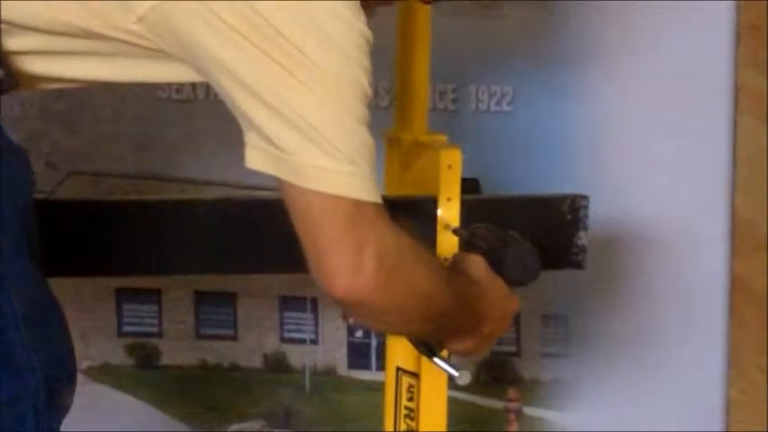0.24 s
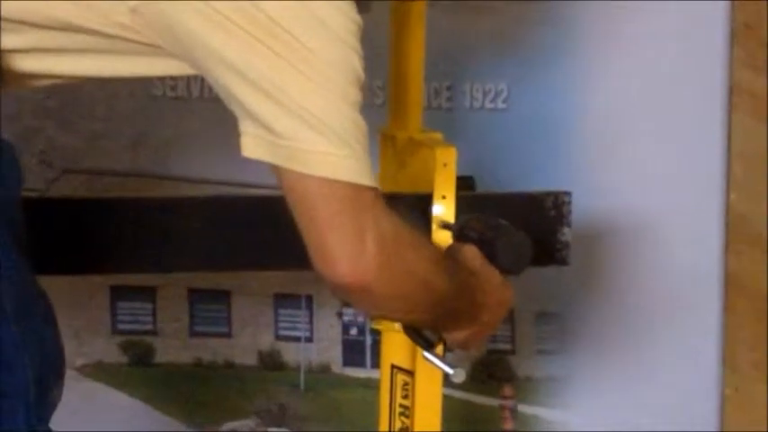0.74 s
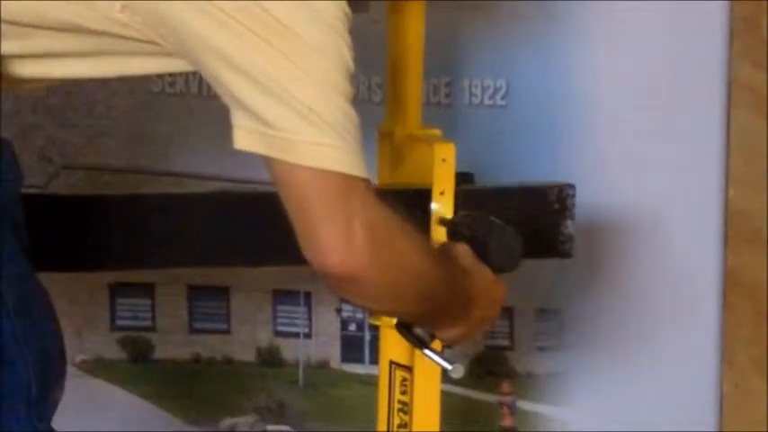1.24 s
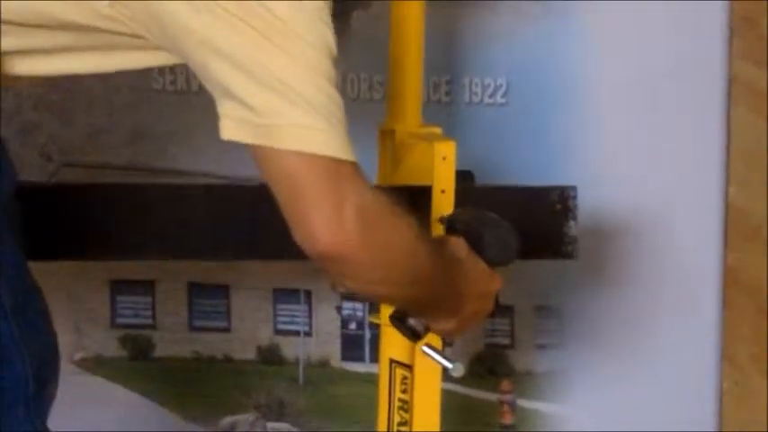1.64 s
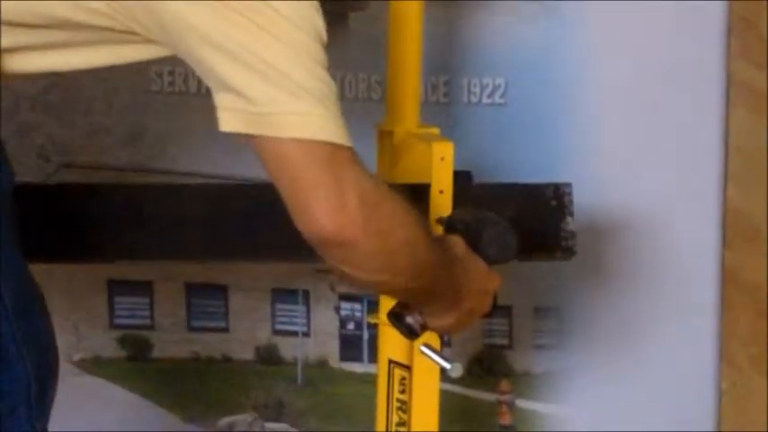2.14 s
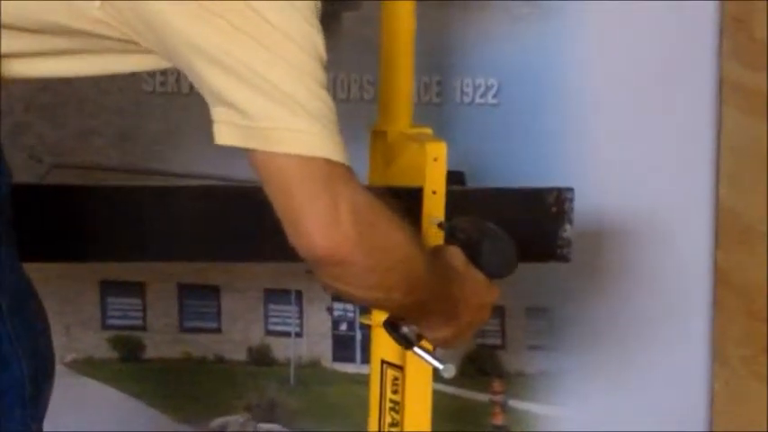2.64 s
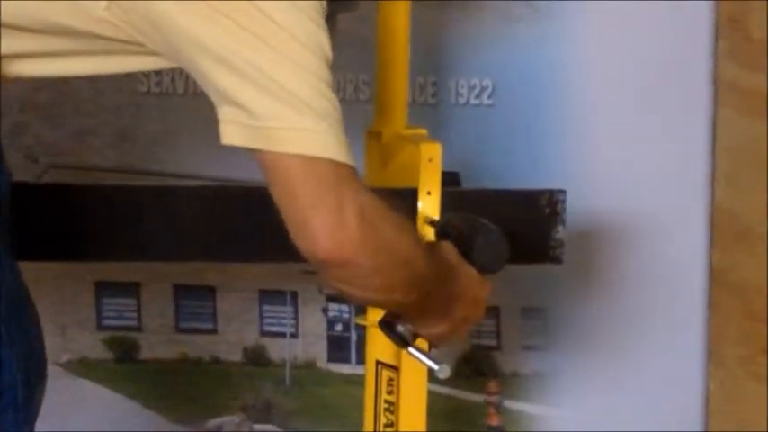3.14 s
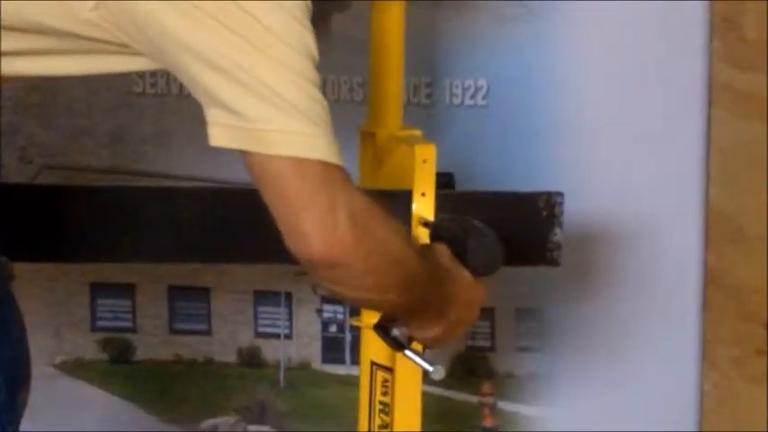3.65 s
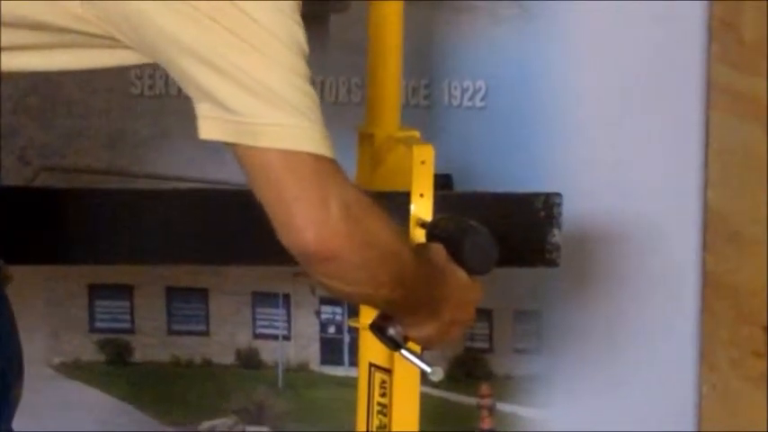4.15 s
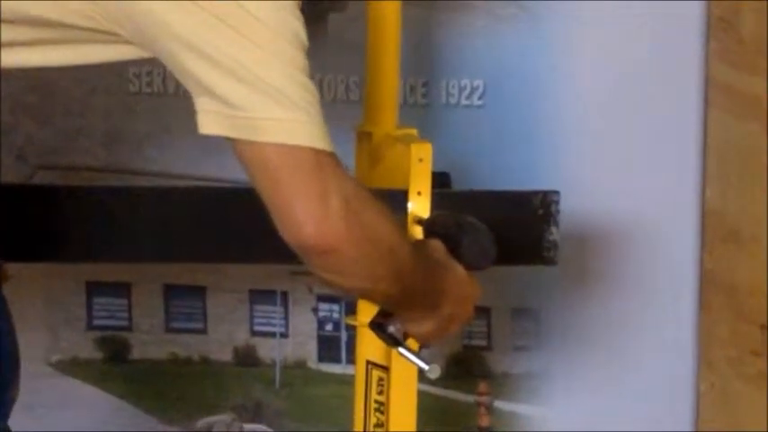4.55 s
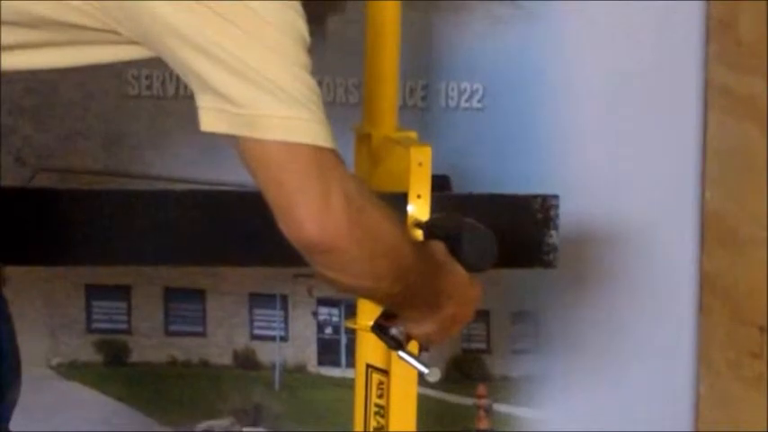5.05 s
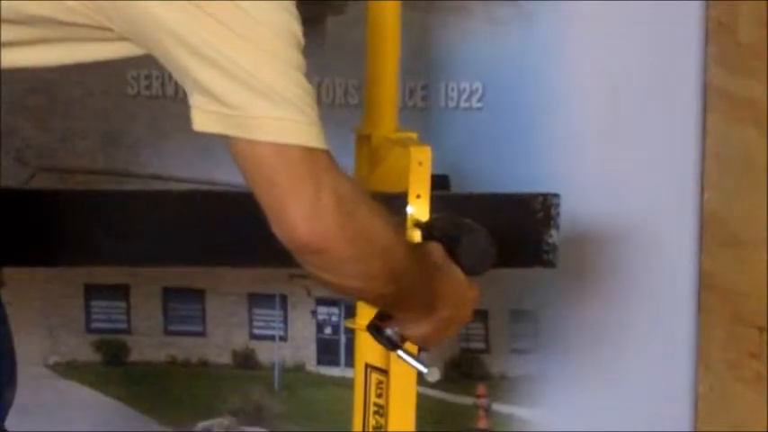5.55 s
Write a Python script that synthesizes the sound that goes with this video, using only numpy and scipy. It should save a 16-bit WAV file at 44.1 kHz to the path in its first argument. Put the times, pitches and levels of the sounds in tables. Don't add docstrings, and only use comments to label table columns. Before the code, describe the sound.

Close stereo phone pickup of a cordless driver: soft knock, hard chuck clacks, a rising gear whine held for under a second, then a falling whine and braking clunks. A quieter gap has wood bumps, dry scraping and tiny singing tones from a loose part. The motor winds up again and its impact mechanism rattles harshly, about forty blows a second, ringing the steel rail in a small hard room.

```python
import sys
import numpy as np
from scipy import signal
from scipy.io import wavfile
from scipy.ndimage import uniform_filter1d

SR = 44100
rng = np.random.default_rng(int(sys.argv[2]) if len(sys.argv) > 2 else 0)


def convert_level_to_amplitude(level_db):
    exponent = np.asarray(level_db, float) / 20
    return 10 ** exponent


def dump_mix(stems):
    frames = np.atleast_2d(stems).T
    limited = np.clip(frames, -1, 1)
    pcm = np.round(limited * 32767).astype(np.int16)
    wavfile.write(sys.argv[1], SR, pcm)


N = 255383


def evened(x):
    return x / np.sqrt(np.mean(x ** 2) + 1e-20)


def read(points, hz):
    f, value = np.transpose(points)
    return np.interp(np.log(hz + 1), np.log(f + 1), value)


def played(rows):
    s, *columns = np.transpose(rows)
    return [np.interp(np.arange(N) / SR, s, c) for c in columns]


def coloured(x, points):
    gain_db = np.maximum(read(points, abs(np.fft.fftfreq(4096, 1 / SR))), -90)
    log_gain = np.log(convert_level_to_amplitude(gain_db))
    taps = np.fft.ifft(np.exp(np.conj(signal.hilbert(log_gain)))).real[:2048]
    return signal.oaconvolve(x, taps)[:len(x)]


def ringing(x, modes):
    out = np.zeros(N)
    for (hz, width, db), drive in zip(modes, np.broadcast_to(x, (len(modes), N))):
        pole = np.exp(-np.pi * width / SR + 2j * np.pi * hz / SR)
        ring = signal.lfilter([1, -1], [1, -pole], drive).imag
        out += convert_level_to_amplitude(db) * (1 - abs(pole)) * ring * SR / (2 * np.pi * hz)
    return out


def wander(hz):
    return evened(signal.lfilter(*signal.butter(2, hz, fs=SR), rng.standard_normal(N)))


def grit(per_s, spread_db):
    size = convert_level_to_amplitude(spread_db * np.minimum(rng.exponential(1, N), 5)) * rng.choice([-1, 1], N)
    return size * (rng.random(N) < per_s / SR)


def swell(start, length):
    return np.sin(np.pi * np.clip((np.arange(N) / SR - start) / length, 0, 1))


# frequency in Hz, level in dB.
APART = [(20, -49), (50, -5), (120, -87), (500, -44), (2000, -9.5), (8000, -4), (14000, 0)]


def pair(a, b):
    side = np.fft.irfft(np.fft.rfft(b) * convert_level_to_amplitude(read(APART, np.fft.rfftfreq(len(b), 1 / SR))), len(b))
    return np.array([a + side, a - side])


# frequency in Hz, level in dB per Hz.
AIR = [(53, -2), (90, -12), (454, -12), (642, -14), (796, -13), (1170, -18.5), (1280, -15.5), (1490, -14.5),
       (1660, -23.5), (2340, -23.5), (10200, -34), (14700, -36), (15700, -55)]
# frequency in Hz, width in Hz, level in dB.
HUM = [(1315, 14, 0), (1690, 30, 0)]


def air():
    a, b = (evened(coloured(z, AIR)) for z in rng.standard_normal((2, N)))
    fading = convert_level_to_amplitude(-6 - 4 * np.arange(N) / SR)
    hum = fading * evened(ringing(rng.standard_normal(N), HUM))
    return convert_level_to_amplitude(-59.5 + 1. * wander(3)) * (pair(a, b) + hum)


# time in seconds, level in dB.
SURGES = [(.32, -71), (.64, -54), (.93, -56), (1.42, -57), (1.839, -48), (2.69, -51), (3.32, -53),
          (3.79, -64), (4.79, -64)]


def grip():
    colour = [(12, -7), (30, 17.5), (70, 25.0), (110, 20.0), (170, -28.0)]  # Hz, dB per Hz
    a, b = (evened(coloured(z, colour)) for z in rng.standard_normal((2, N)))
    t, surge_s = np.arange(N) / SR, 0.055
    surges = sum(convert_level_to_amplitude(db) * np.exp(-((t - s) / surge_s) ** 2) for s, db in SURGES)
    return (convert_level_to_amplitude(-65.5) + surges) * pair(a, b)


# time in seconds, hold in seconds, fall in dB per second, level in dB.
BUMPS = [
    (0.272, 0.035, 200, -56.5),
    (0.788, 0.26, 47, -40),
    (1.345, 0.042, 158, -40),
    (1.779, 0.066, 261, -41),
    (2.25, 0.082, 200, -50.5),
    (2.359, 0.053, 200, -48.5),
    (2.5, 0.08, 97, -40.5),
    (3.055, 0.069, 64, -43),
]
# start in seconds, length in seconds, then high wood, bracket and scrape levels in dB.
SLIDES = [(1.753, 0.11, -80, -52.5, -67), (2.032, 0.18, -63, -56, -57), (2.245, 0.059, -81, -72, -59.5),
          (2.345, 0.073, -76, -57.5, -70), (2.492, 0.19, -28.5, -49, -67), (2.66, .13, -59, -62, -63),
          (2.84, 0.044, -70, -60, -68.5), (2.945, 0.067, -73, -66, -66)]
# frequency in Hz, width in Hz, level in dB.
WOOD = [(153.4, 53, -7.5), (213.3, 42, -0.5), (289.3, 84, 0), (363, 51, 0), (442, 60, -3.5),
        (526, 110, -21.5)]
BRACKET = [(734, 22, 0), (990, 60, -6), (1260, 30, -1), (1508, 50, -5), (1650, 50, -3), (1950, 60, -6),
           (2355, 100, -9), (1100, 1200, -13)]
EDGE = [(3350, 120, 0), (4400, 120, 0), (5300, 150, -3), (6400, 120, -1), (7200, 200, -5)]


def drag():
    t = np.arange(N) / SR
    low = sum(np.clip((t - s) / 0.004, 0, 1) * convert_level_to_amplitude(db - fall * np.maximum(t - s - hold, 0))
              for s, hold, fall, db in BUMPS)
    high, metal, dry = sum(abs(swell(s, length)) ** 0.74 * convert_level_to_amplitude(np.array(db))[:, None]
                           for s, length, *db in SLIDES)
    slips = grit(730, 1.0)
    low_wood = signal.lfilter(*signal.butter(2, 420, fs=SR), ringing(slips, WOOD[:3]))
    high_wood = ringing(slips, WOOD[3:])
    wood = low * convert_level_to_amplitude(-1.5) * evened(low_wood) + high * convert_level_to_amplitude(-7.5) * evened(high_wood)
    bracket = metal * convert_level_to_amplitude(0.7) * evened(ringing(grit(2400, 0.77), BRACKET))
    scrape_colour = [(1200, -30), (2500, 0), (6000, -9), (9000, -24), (15500, -45)]  # Hz, dB per Hz
    scrape = evened(coloured(grit(5000, 2.5), scrape_colour))
    scrape = scrape + convert_level_to_amplitude(-3) * evened(ringing(grit(1500, 3.0), EDGE))
    dull = signal.butter(2, 8000, fs=SR)
    return signal.lfilter(*dull, wood + bracket) + dry * convert_level_to_amplitude(-7.0) * scrape


# frequency in Hz, seconds to fall by 60 dB.
ROOM = [(100, 0.56), (1000, 0.55), (4000, 0.067), (12000, 0.029)]


def room(x):
    taps = np.zeros((2, SR // 2))
    at = np.arange(40, SR // 2 - 20, 20) + rng.integers(0, 20, (2, (SR // 2 - 41) // 20))
    np.put_along_axis(taps, at, rng.choice([-1., 1.], at.shape), 1)
    hz, t, z = signal.stft(taps, SR, nperseg=256)
    dying = convert_level_to_amplitude(-60 * t / read(ROOM, hz)[:, None])
    tail = signal.istft(z * dying, SR, nperseg=256)[1]
    return signal.fftconvolve(x[None], pair(*tail) / np.linalg.norm(tail[0]), axes=1)[:, :N]


# start in seconds, stop in seconds, level in dB.
SWITCH = [
    (.33, .57, -79),
    (2.97, 3.04, -79),
]


def switch():
    level = sum(convert_level_to_amplitude(db) * np.sqrt(abs(swell(s, stop - s))) for s, stop, db in SWITCH)
    return level * np.sin(2 * np.pi * 8800 * np.arange(N) / SR)


# frequency in Hz, width in Hz, level in dB.
RAIL = [(736, 41.2, -6.5), (814, 240, 2), (801, 27, -16), (977.4, 65.4, -2), (1084, 81, -6),
        (1219, 51.6, -4.5), (1334, 35, -12), (1512, 132, 0.5), (1594, 85, 4), (1727, 130, 2),
        (1927, 71, -3), (2070, 77, -6.5), (2285, 160, -1.5), (3190, 87, -67)]


def hits(rows, colour, crack_db, rail_db, rise_s, fall_s, thud_db, brighten_db):
    even_s = 4.02
    t, out, crack = np.arange(4000) / SR, np.zeros(N + 4000), np.zeros((2, N + 4000))
    modes = np.array(RAIL + [(hz, 1.14 * width, db + thud_db) for hz, width, db in WOOD])
    hz, width, db = modes.T[:, :, None]
    burst = .85 * np.exp(-(t / fall_s) ** 2) + .15 * np.exp(-t / (2.5 * fall_s))
    burst = (1 - np.exp(-t / 0.0005)) * burst
    growth = (1 - np.exp(-t / rise_s)) ** 2 * np.exp(-np.pi * width * t)
    octaves = np.log2(np.maximum(hz, 700) / 1400)
    for s, peak_db, ring_db in rows:
        at = round(s * SR)
        z, chance = rng.standard_normal((3, 4000)), rng.standard_normal((3, len(modes), 1))
        chatter = convert_level_to_amplitude(0.98 * evened(uniform_filter1d(z[2], 40))) * burst
        crack[:, at:at + 4000] += convert_level_to_amplitude(peak_db + crack_db) * z[:2] * chatter
        struck_hz = hz * (1 + .004 * chance[1])
        struck_db = db + 3.5 * chance[0] + brighten_db * (s - even_s) * octaves
        tones = convert_level_to_amplitude(struck_db) * growth * np.sin(2 * np.pi * struck_hz * t + 9 * chance[2])
        out[at:at + 4000] += convert_level_to_amplitude(ring_db + rail_db) * tones.sum(0)
    loudness = np.linalg.norm(coloured(np.arange(4096) == 0, colour))
    ahead, sideways = (coloured(c[:N], colour) / loudness for c in crack)
    return np.array([out[:N] + ahead, sideways])


# time in seconds, peak in dB, rail ring in dB.
CLACKS = [(0.3421, -40.5, -56), (0.5753, -19, -26), (0.5841, -6, -26), (0.5974, -12, -25),
          (0.6142, -19, -21), (0.621, -14, -45), (0.6304, -21.5, -46), (1.372, -25.5, -21.5),
          (1.399, -23, -17), (1.445, -40, -25.5), (1.7866, -37, -29), (2.3994, -63, -54), (2.974, -53, -53),
          (2.9942, -35.5, -57), (3.045, -48, -28)]
# frequency in Hz, level in dB per Hz.
CLUNK = [(88, -50), (150, 2), (519, -9), (781, 7), (912, 3), (985, 3.5), (2060, -5), (2360, 3.5),
         (4840, -1.5), (15500, -26)]


def clacks():
    return hits(CLACKS, CLUNK, crack_db=-12.0, rail_db=-8.0, rise_s=0.0046, fall_s=0.0063,
                thud_db=2.6, brighten_db=0)


# time in seconds, gear tooth rate (mesh) in Hz, drive in dB, bite of the gears in dB.
PULLS = [
    [(.39, 250.2, -80, -8), (.45, 350.1, -57.5, -23), (.58, 780, -41, 1.5), (.66, 950, -46, -28),
     (.72, 1008, -43.5, -9), (.85, 1041, -42.5, -49), (1.38, 1053, -43, -9), (1.45, 963, -51.5, -12),
     (1.72, 535, -73.5, -3)],
    [(2.96, 301, -73, 1), (2.99, 319, -56.5, -6), (3.045, 484, -47.5, -3), (3.08, 723.6, -44, 4),
     (3.118, 824, -40.5, -13), (3.156, 926, -44, 5), (3.228, 987, -43.5, 14), (3.3, 950, -41.5, 19),
     (3.335, 860, -41.5, 19)],
    [(3.37, 822, -38, -19), (3.6, 795, -39, -34), (3.9, 893, -42, -28), (4.15, 941.5, -41, -14),
     (5.79, 977, -41.5, -66)],
]
# multiple of the tooth rate, level in dB.
WHINE = [(.667, -7), (1, 0), (2, -8), (3, -1), (3.6, -6), (3.9, -3), (4, -2), (4.9, -8), (5, -1),
         (5.07, -9), (6, -11), (7, -14), (11, -23), (12, -29)]
# frequency in Hz, level in dB.
CASING = [(2200, 0), (2500, -6), (3000, 0), (3300, 0), (3700, -4), (4100, -3), (4500, -7), (5000, 0)]
# tooth rate in Hz, level in dB.
OVERTONE_ONSET = [(550, -18), (880, 0)]


def gears():
    mesh_hz = uniform_filter1d(played(sum(PULLS, []))[0], size=900)
    turns = np.cumsum(mesh_hz * (1 + .0036 * wander(25))) / SR
    overtones = np.zeros(N)
    for k, db in WHINE:
        level_db = db + read(CASING, k * mesh_hz) + 3.5 * wander(40)
        overtones += convert_level_to_amplitude(level_db) * np.sin(2 * np.pi * k * turns)
    return turns, np.sqrt(2) * convert_level_to_amplitude(-7 + read(OVERTONE_ONSET, mesh_hz)) * overtones


# frequency in Hz, level in dB per Hz.
HISS = [(350, -19), (600, -10), (980, -2.5), (2540, -14), (3070, -6), (3520, -9), (5150, -9), (8750, -24.5),
        (11800, -28), (14000, -32), (15500, -46)]
# tooth rate in Hz, level in dB.
UNBALANCE = [(400, -14), (900, 0.5), (1035, -2)]
FIRST_BLOW_S = 3.3426


def motor(rows, turns, overtones):
    mesh_hz, drive_db, bite_db = played(rows)
    t = np.arange(N) / SR
    start_s, stop_s = rows[0][0], rows[-1][0]
    on = np.interp(t, [start_s, start_s + 0.024, stop_s - .03, stop_s + 0.0048], [0, 1, 1, 0])
    hammering = np.clip((t - FIRST_BLOW_S) / 0.045 + 1, 0, 1)

    slow_db = read([(400, -25), (540, 0)], mesh_hz)
    loose_db = np.interp(bite_db, [0, 10], [3.5, .4])
    whine_db = drive_db + bite_db + slow_db + loose_db * wander(44)
    whine = convert_level_to_amplitude(whine_db) * np.sin(2 * np.pi * turns)

    shaft = (1 + .3 * np.cos(2 * np.pi * turns / 3)) * convert_level_to_amplitude(1.5 * wander(60))
    hiss, sideways = (convert_level_to_amplitude(drive_db + 1.5) * evened(coloured(shaft * z, HISS))
                      for z in rng.standard_normal((2, N)))

    slack_db = 1.5 * np.minimum(drive_db + 46, 0)
    load_db = -4 * np.clip((t - FIRST_BLOW_S) / 0.32, 0, 1)
    overtones = overtones * convert_level_to_amplitude(slack_db + .14 * np.clip(bite_db + 1, 0, 14) + load_db)

    shake = grit(1500, 2.76) * convert_level_to_amplitude(2.5 * wander(5.5))
    wood = evened(ringing(shake, WOOD[:3])) + convert_level_to_amplitude(-3) * evened(ringing(shake, WOOD[3:]))
    clamp_db = hammering * -2.5 * (t - FIRST_BLOW_S)
    wood_db = -2.5 + read(UNBALANCE, mesh_hz) + clamp_db
    rail_db = -5 + 0.44 * bite_db + 12 * hammering
    rumble = convert_level_to_amplitude(wood_db) * wood + convert_level_to_amplitude(rail_db) * evened(ringing(shake, RAIL))
    return on * np.array([whine + convert_level_to_amplitude(drive_db) * (overtones + rumble) + hiss, sideways])


# start in seconds, length in seconds, frequency in Hz, level in dB.
PINGS = [(1.782, 0.047, 1690, -63), (1.781, 0.03, 775, -53.5), (1.997, 0.15, 738, -71),
         (2.072, .13, 1260, -66), (2.125, 0.089, 735, -64), (2.25, 0.027, 1144, -65),
         (2.37, 0.057, 1150, -60), (2.56, 0.033, 1128, -49.5), (2.734, 0.029, 1140, -59)]


def pings():
    out = np.zeros(N)
    for s, length_s, hz, db in PINGS:
        t = np.arange(round(length_s * SR)) / SR
        tone = np.sin(np.pi * t / length_s) * np.sin(2 * np.pi * hz * t)
        out[round(s * SR):][:len(t)] += convert_level_to_amplitude(db + 9.0) * tone
    return out * convert_level_to_amplitude(2.4 * wander(43))


# time in seconds, crack in dB, rail ring in dB.
STRENGTH = [(3.343, -12.5, -7.5), (3.372, -13, -9), (3.41, -17.5, -15.5), (3.49, -17, -15.5),
            (3.56, -18.5, -14.5), (4.4, -20, -17), (4.75, -17, -17), (5.79, -18, -21)]


def blows():
    count, jitter_s, spread_db, lug_db = 96, .0005, 1.6, 1.3
    k, chance = np.arange(count), rng.standard_normal((count, 3))
    gaps = .0258705 + .0030689 * np.exp(-k / 13.03) - 1.5065e-5 * k
    s = FIRST_BLOW_S + np.cumsum(gaps) - gaps + jitter_s * chance[:, 0] * (k > 0)
    at, *levels = np.transpose(STRENGTH)
    crack_db, ring_db = (np.interp(s, at, v) for v in levels)
    crack_db = crack_db + spread_db * chance[:, 1]
    ring_db = ring_db + spread_db * chance[:, 2] + lug_db * (-1) ** k
    return np.transpose([s, crack_db, ring_db])


# frequency in Hz, level in dB per Hz.
CRACK = [(300, -24), (620, -16), (750, -6), (1900, -2.5), (2700, -6), (5200, -1), (8500, -12), (11500, -15),
         (15500, -31)]


def hammer(struck):
    chance = abs(rng.standard_normal((len(struck) - 1, 3)))
    rebounds = struck[:-1] + [.015, -17, -9] - [-.002, 4, 4] * chance
    return hits(np.vstack([struck, rebounds]), CRACK, crack_db=-8.0, rail_db=1.36, rise_s=0.0016,
                fall_s=0.0079, thud_db=-27.5, brighten_db=2)


# frequency in Hz, fall in seconds, level in dB.
THUMP = [(42.97, 0.024, -72), (84, 0.014, -57), (153, 0.014, -52.5), (233, 0.033, -63.5)]


def thumps(times):
    t, train = np.arange(6000) / SR, np.zeros(N)
    train[np.round(times * SR).astype(int)] = 1
    push = sum(convert_level_to_amplitude(db) * np.exp(-t / fall_s) * np.sin(2 * np.pi * hz * t) for hz, fall_s, db in THUMP)
    return signal.oaconvolve(train, push)[:N]


def scene():
    spin = gears()
    struck = blows()
    tool = motor(PULLS[0], *spin) + motor(PULLS[1] + PULLS[2], *spin)
    tool += hammer(struck) + clacks()
    tool += [drag() + pings() + switch(), np.zeros(N)]
    no_bass = signal.butter(4, 95, "high", fs=SR, output="sos")
    ahead, sideways = signal.sosfilt(no_bass, tool)
    unlike = pair(0, sideways)
    direct = convert_level_to_amplitude(-0.5) * np.array([np.roll(ahead, 1), ahead])
    direct += convert_level_to_amplitude(-3.5) * np.array([unlike[0], np.roll(unlike[1], shift=60)])
    return direct + convert_level_to_amplitude(-15) * room(ahead) + air() + grip() + thumps(struck[:, 0])


def top_cut(x):
    return signal.sosfilt(signal.butter(12, 15810, fs=SR, output="sos"), x)


OFFSET = [
    [0.004],
    [0.0016],
]


def record(dry):
    overloaded = 0.71 * np.tanh(dry / 0.73)
    edge = signal.firwin(301, 15300, window=("kaiser", 8), fs=SR)
    mix = signal.oaconvolve(overloaded, edge[None], "same") + OFFSET
    return top_cut(mix)


dry = scene()
out = record(dry)
dump_mix(out)
```